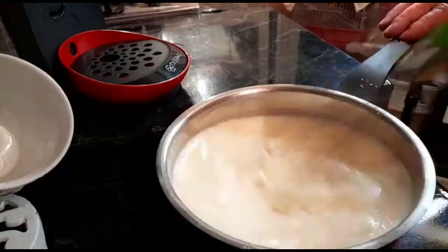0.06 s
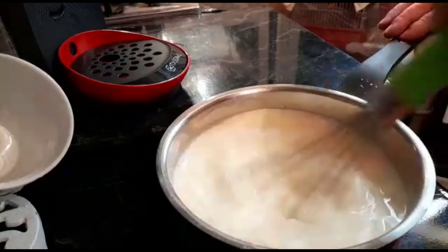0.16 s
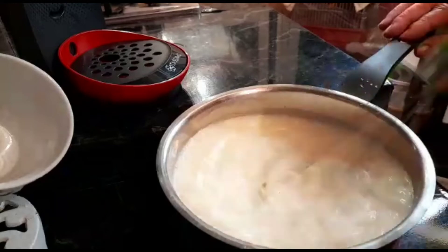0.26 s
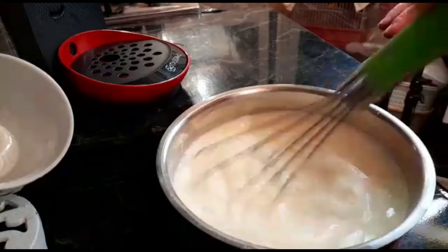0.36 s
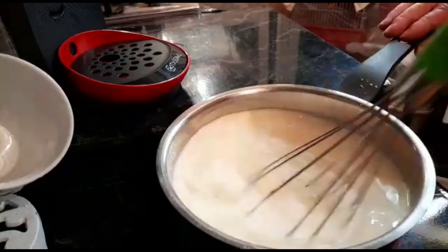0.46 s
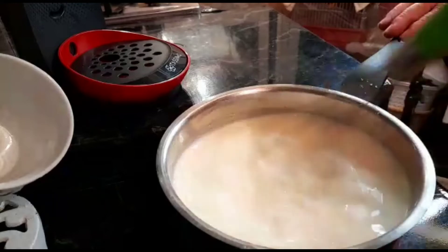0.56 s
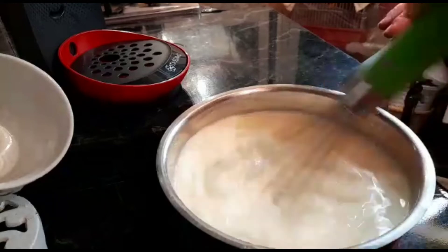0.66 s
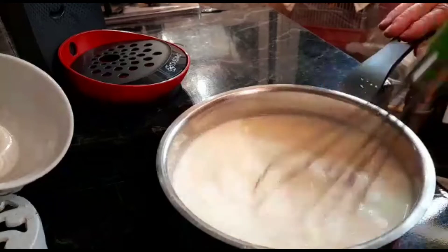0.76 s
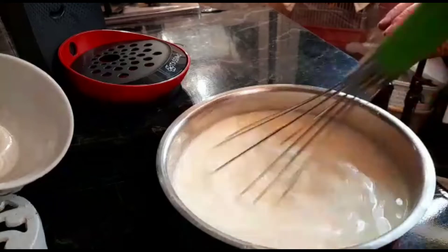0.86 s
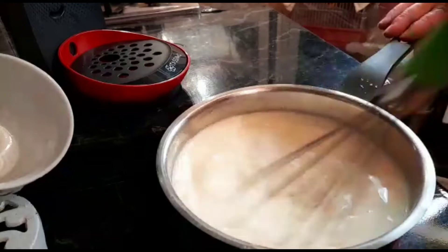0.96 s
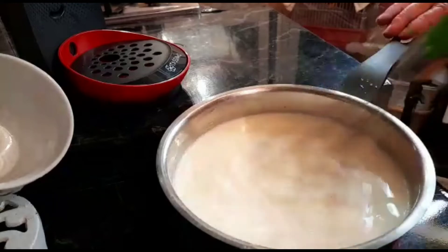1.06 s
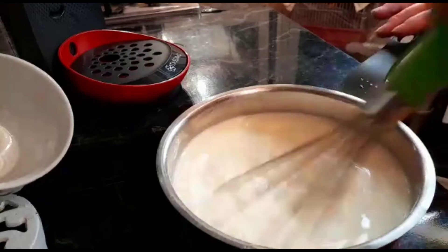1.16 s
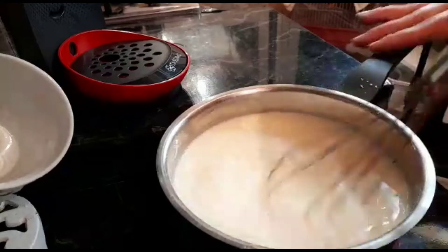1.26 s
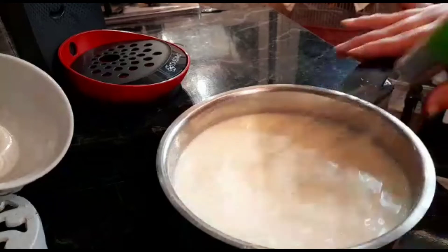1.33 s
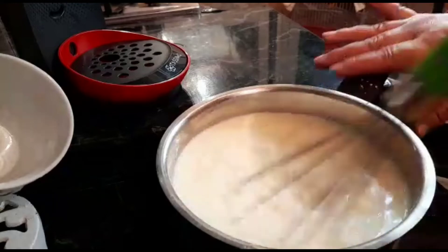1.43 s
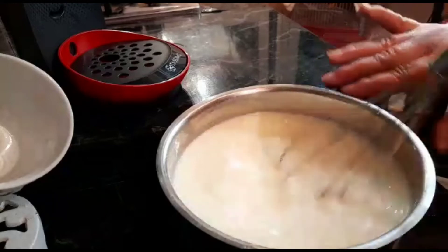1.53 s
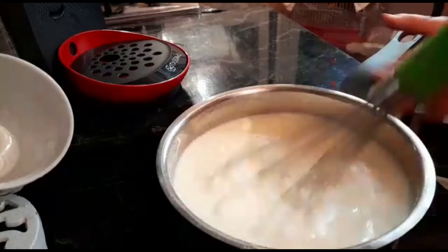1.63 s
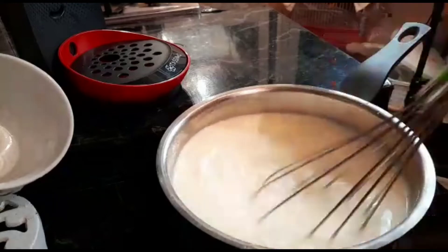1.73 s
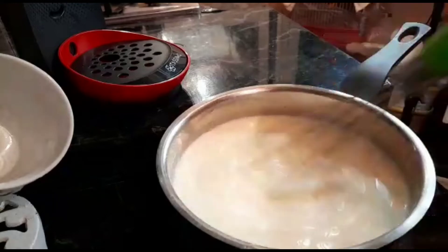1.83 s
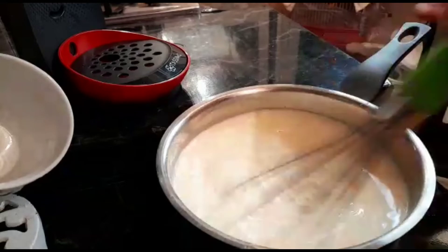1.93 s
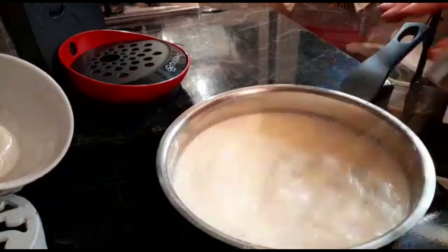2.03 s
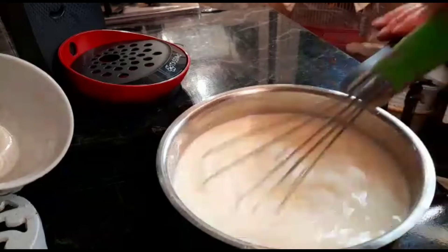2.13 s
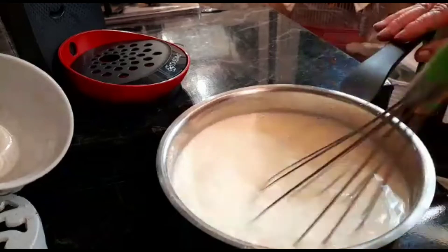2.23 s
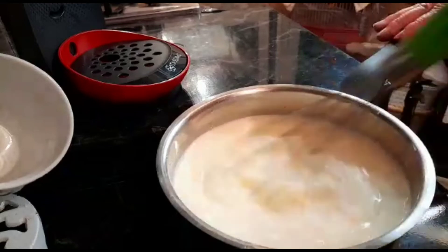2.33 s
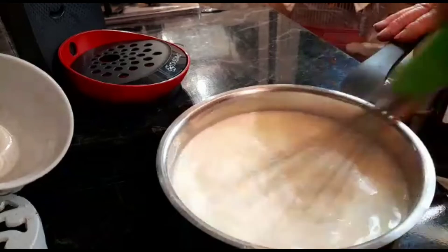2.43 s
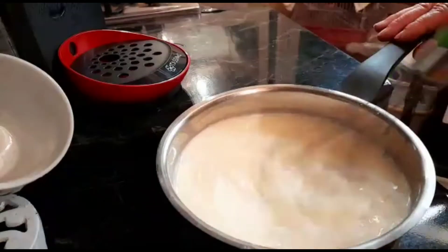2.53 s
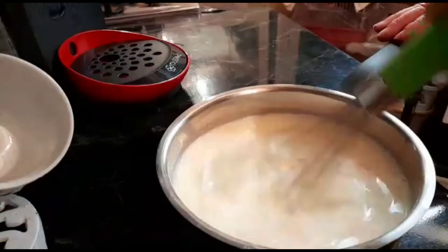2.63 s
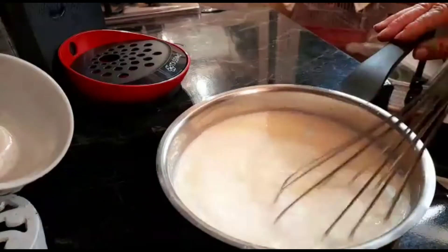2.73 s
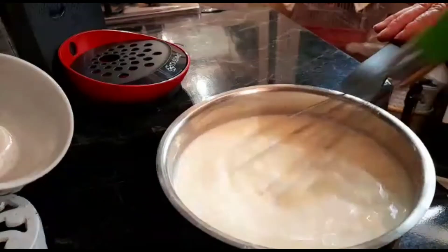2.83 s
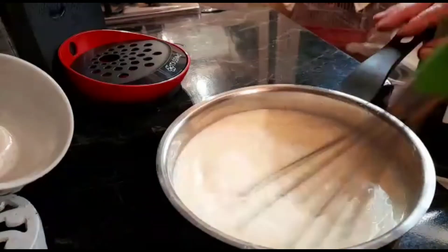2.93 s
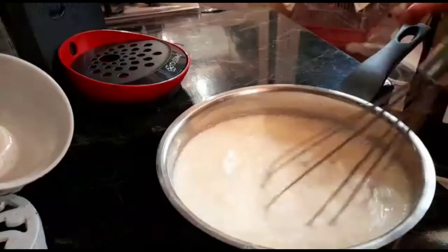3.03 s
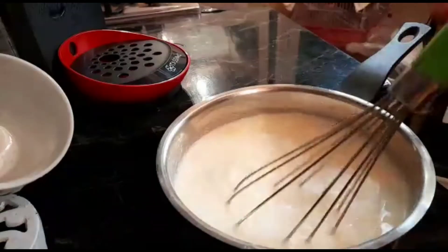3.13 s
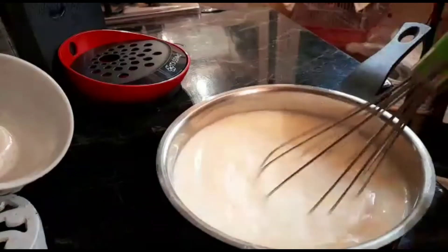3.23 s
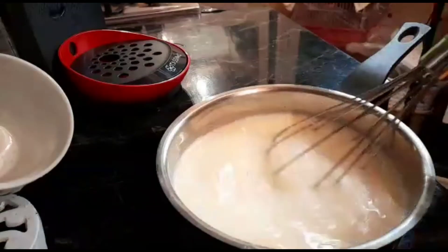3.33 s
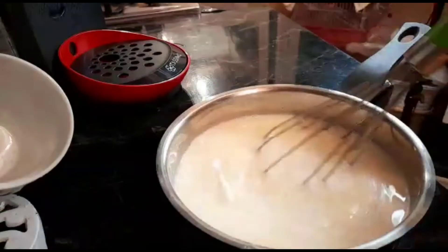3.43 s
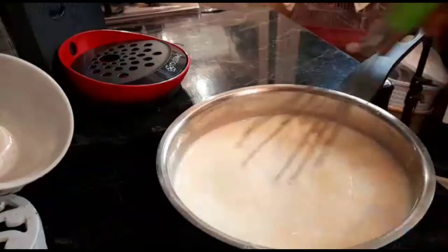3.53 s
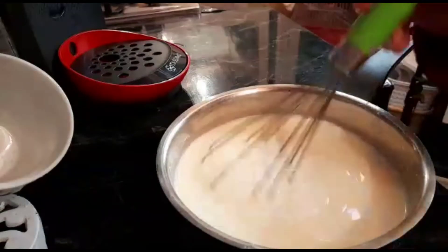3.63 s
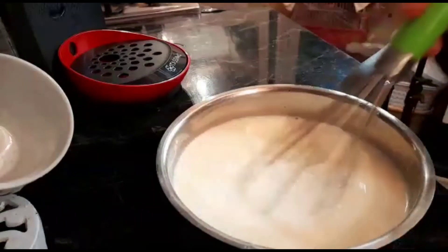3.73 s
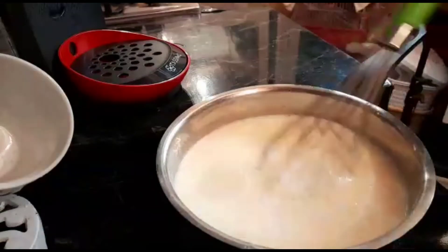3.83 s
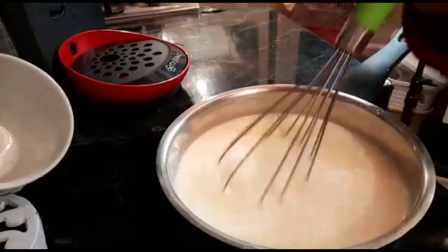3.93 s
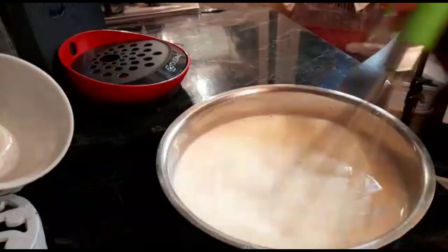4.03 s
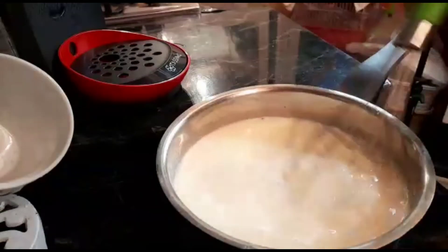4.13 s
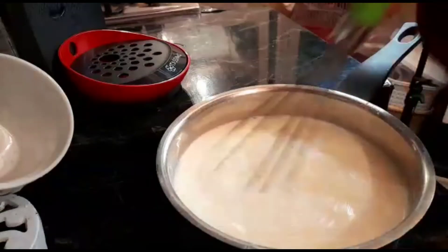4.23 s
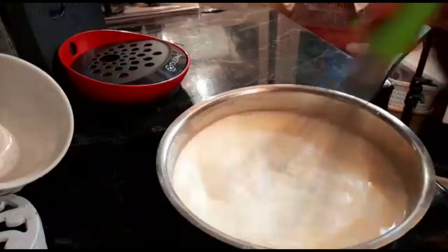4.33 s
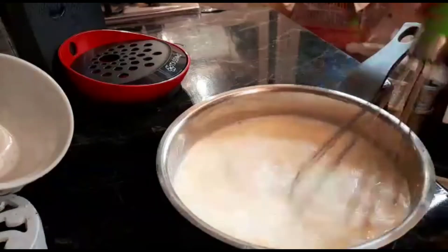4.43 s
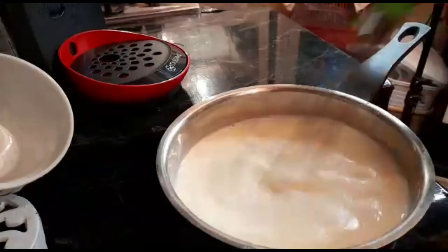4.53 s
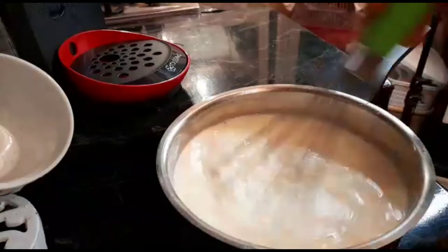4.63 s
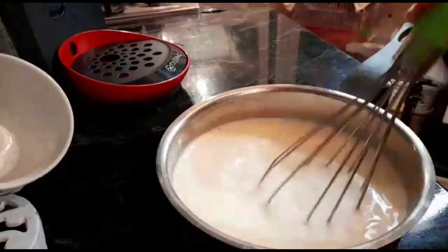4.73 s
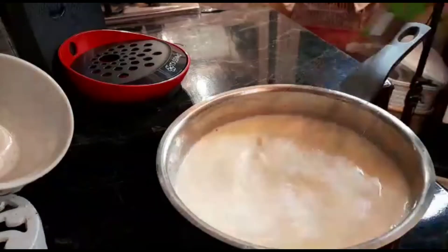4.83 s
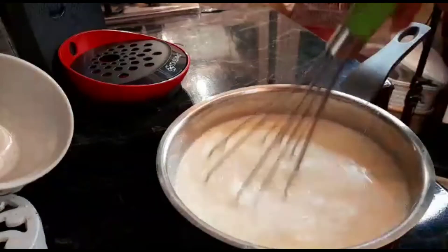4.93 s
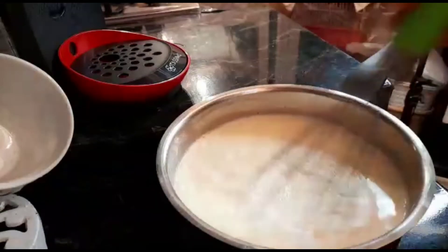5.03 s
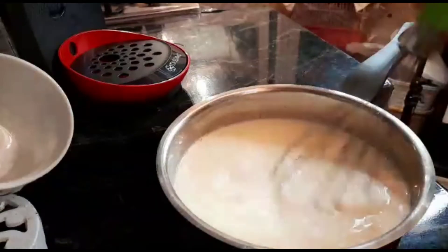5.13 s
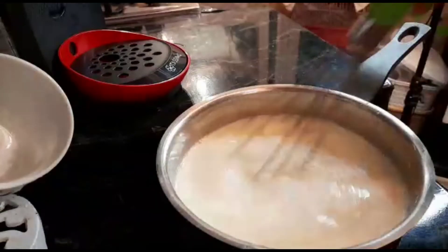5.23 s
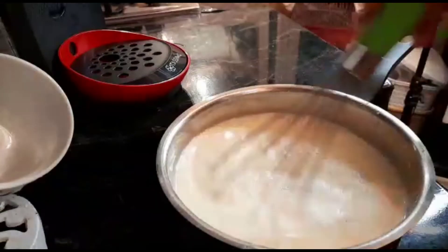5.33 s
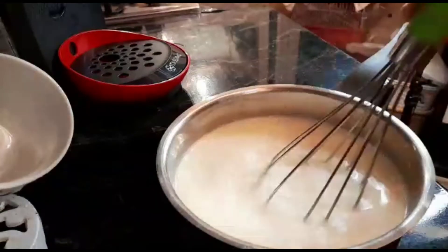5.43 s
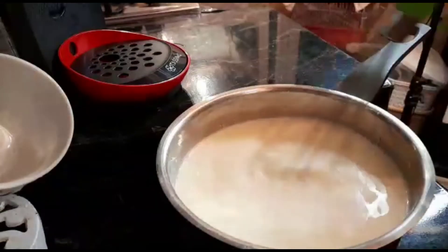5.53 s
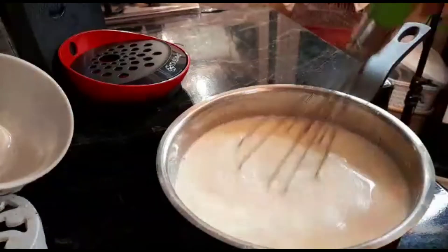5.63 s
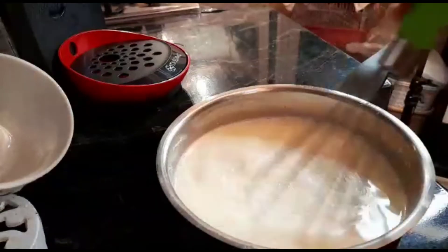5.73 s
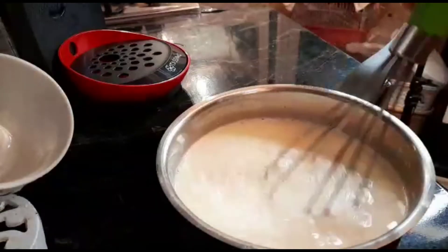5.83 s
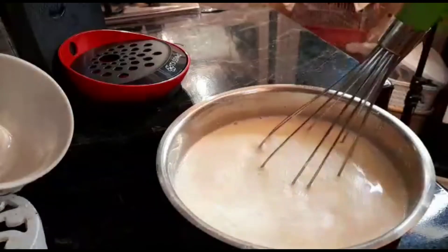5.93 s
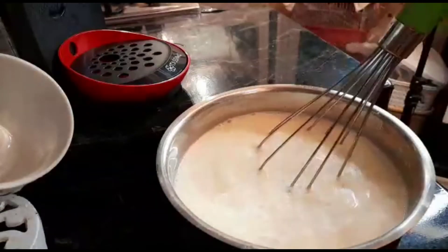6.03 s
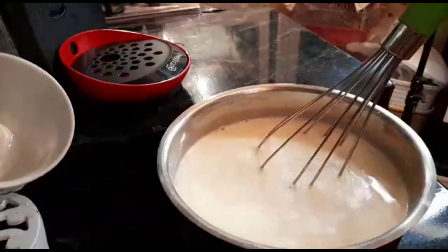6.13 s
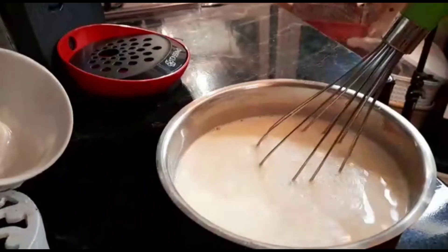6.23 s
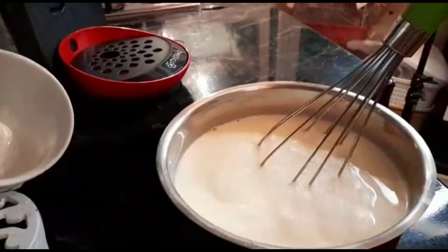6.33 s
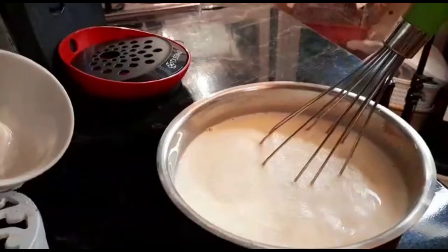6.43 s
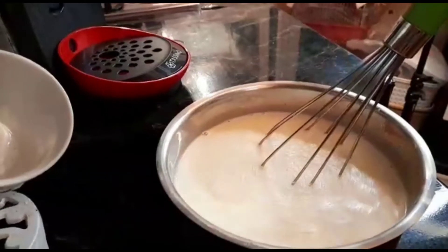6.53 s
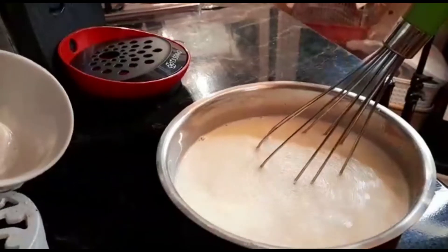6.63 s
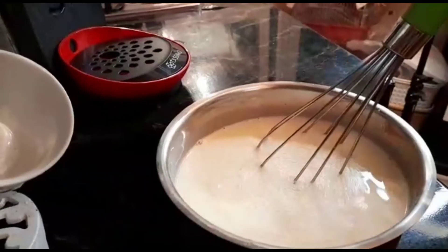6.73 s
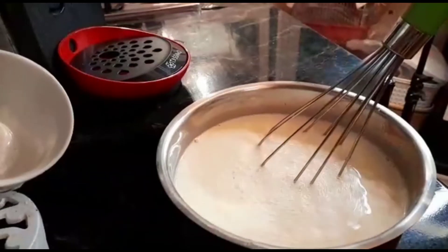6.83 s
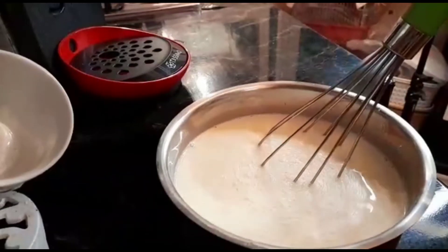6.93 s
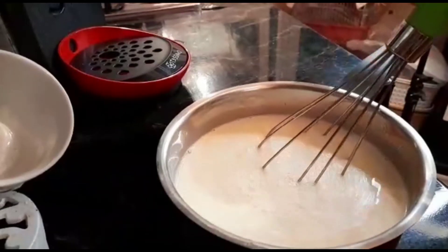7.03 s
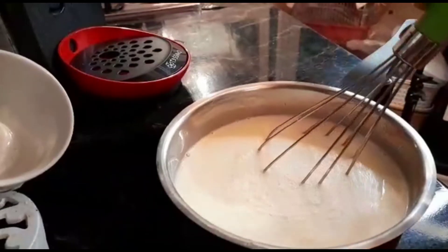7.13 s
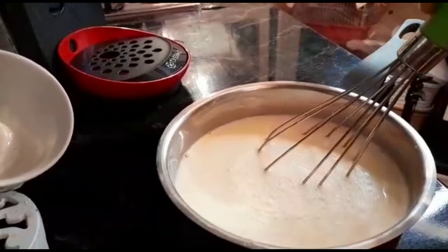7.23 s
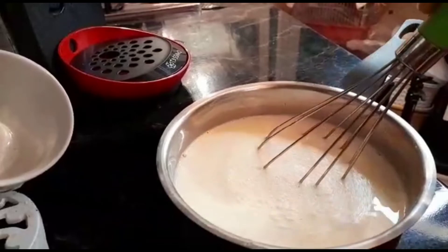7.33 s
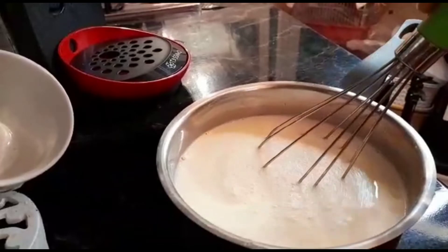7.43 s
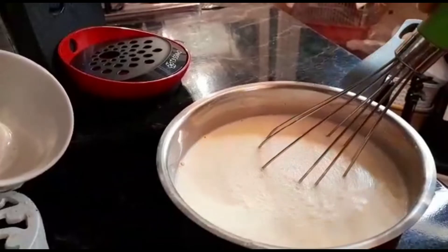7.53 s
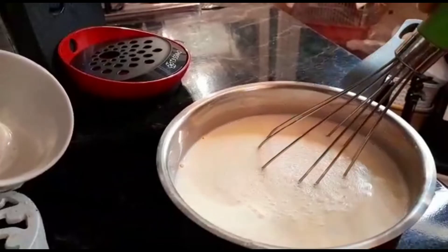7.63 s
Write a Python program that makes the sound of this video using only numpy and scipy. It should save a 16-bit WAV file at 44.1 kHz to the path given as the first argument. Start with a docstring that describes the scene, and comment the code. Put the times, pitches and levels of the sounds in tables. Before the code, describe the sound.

A close, fairly dry stereo sound of a wire whisk beating batter in a steel saucepan in a quiet kitchen. From 0 to about 3.2 seconds the strokes are quick and uneven: hard, bright ticks of wires on steel, strongest near 0.43, 0.97, 1.2, 1.6, 2.0, 2.45 and 2.7, each followed by a tiny rattle. Between them run lighter clicks, a gritty rasping scrape and short, glassy pan tones, with an occasional soft low note as the pan rocks. The whisking fades to almost nothing around 3.4 to 3.6, then resumes softer and looser, with sharper clicks near 4.2, 4.6 and 4.9. A tight, bright cluster strikes at 5.57 to 5.6, with lesser knocks until 5.85. By 6.0 the scraping dies; faint ticks follow at 6.2 and 6.3. To 7.6 only very faint hum, rumble, hiss and fine foam crackle remain.

```python
"""Quick clusters of steel ticks and a rasping scrape: a wire whisk beats batter in a saucepan, heard from close by.
Blows and friction are noise-like forces that excite three damped resonators: pan floor, pan wall and wires.
Single modes sing out as short gliding tones; at times the pan rocks with a low note, a sine in soft swells.
Filtered noise and two mains tones make hum, rumble and faint hiss; decaying treble noise bursts make foam pops.
A short, faint echo of decaying noise is the quiet kitchen."""
import sys
import numpy as np
from scipy import signal
from scipy.fft import rfft, irfft, next_fast_len
from scipy.io import wavfile
from scipy.ndimage import uniform_filter1d

SR = 44100
rng = np.random.default_rng(int(sys.argv[2]) if len(sys.argv) > 2 else 0)


def int16_out(signal):
    """Quantize to a 16-bit WAV file."""
    q = np.round(np.clip(np.atleast_2d(signal).T, -1, 1) * 32767)
    wavfile.write(sys.argv[1], SR, q.astype(np.int16))


N = 338247

# Level of hum, rumble and mains tones before their waver: (time [s], level [dB])
HUM_LEVEL = [(0.0, -58.5), (0.35, -62), (0.5, -58), (1.28, -59), (1.8, -62), (2.1, -61), (2.3, -61),
             (2.55, -60.5), (2.76, -59), (3.1, -61.5), (3.5, -67.5), (4.29, -55.5), (4.8, -59.5),
             (5.3, -56.5), (5.7, -66.5), (5.94, -60.5), (6.62, -74.5), (7.0, -68.5), (7.67, -66.5)]
# Hum lines, resonances of noise: (frequency [Hz], width [Hz], relative level [dB])
HUM_LINES = [(99.5, 12, -1), (145, 10, -6.5), (219, 21, -3.5)]
# Spectrum of rumble and hiss: (frequency [Hz], relative density [dB per Hz])
AIR_SPECTRUM = [(18, -40.5), (30, -1.5), (55, -2.5), (75, -13.5), (109, -7.5), (233, 0.5), (600, -21.5),
                (2830, -33.5), (3140, -30), (5740, -29), (6720, -28), (7470, -36.5), (9710, -18),
                (14000, -29), (16000, -47.5)]
# Swells of the rocking pan: (time [s], peak level [dB], half-width to 1/e [ms])
ROCKS = [(.595, -42.5, 37), (.33, -57, 42), (1.61, -57, 35), (2.7, -52.5, 28), (3.06, -48.5, 36),
         (3.88, -61.5, 50), (4.56, -57.5, 38), (5.09, -49.5, 32), (5.76, -55, 30), (6.03, -59.5, 67),
         (6.2, -65, 32), (6.719, -70, 53), (6.99, -61, 39), (7.42, -65, 44)]
# Dense upper modes and microphone colour: (frequency [Hz], relative density [dB per Hz])
UPPER_MODES = [(210, -44), (350, -29.5), (522, -5), (653, -8), (974, 0), (1140, 3), (1650, -4), (2500, 0),
               (2710, -7.5), (3230, -1), (4750, -4.5), (5940, -11), (8000, -6), (10000, 0), (11200, 1),
               (12500, -5), (15300, -7.5), (15700, -14), (15900, -36), (16600, -43)]
# Clear pan modes: (frequency [Hz], width before narrowing [Hz], relative level [dB])
PAN_MODES = [(539.5, 83, -10), (797, 21, -18.5), (1096.4, 35, -7), (1230, 70, -4.5), (1496, 20, -8),
             (1963, 22, -2), (2410, 41, -0.5), (3460, 58, -8.5), (3820, 430, 2.5), (4775, 170, 4.5),
             (5990, 48, -16.5)]
# Floor, wall and wires in turn: (low edge [Hz], high edge [Hz], t60 [s], share common to both ears [1],
# blow gain [dB], scrape gain [dB], clear-mode gain [dB], crack against ring [1], crack decay [s])
PARTS = [(400, 2200, 0.24, 0.62, 0.5, -8, -1.5, 2.4, 0.0035),
         (2530, 6800, 0.14, 0.13, 2.5, -3, -13, 3.5, 0.0019),
         (5905, 38000, 0.066, 0.041, 0.5, 0, -41, 5.6, 0.0011)]
# Clear blows: (time [s], wire drive [dB], floor drive [dB], wall drive [dB], cluster length [ms])
BLOWS = [(0.003, -33, -33.5, -34.5, 5.9), (0.111, -60, -44.5, -66, 66), (0.141, -46, -49, -42.5, 3.5),
         (0.173, -45, -42.5, -33.5, 4.6), (0.253, -53.5, -46, -58, 4), (0.336, -33.5, -35, -36, 6.4),
         (0.346, -33.5, -47, -46, 40), (0.393, -32.5, -67, -62, 7.9), (0.408, -30.5, -52, -61, 9),
         (0.4267, -12.5, -28, -27, 2), (0.4294, -17, -27, -34, 2.9), (0.433, -26, -38, -33.5, 18),
         (0.448, -29.5, -37, -38, 10), (0.461, -28, -35, -41, 10), (0.479, -32, -42, -40, 8),
         (0.666, -53, -39.5, -40, 4.3), (0.727, -25, -32.5, -35, 13), (0.848, -55, -43, -34.5, 5.9),
         (0.903, -35.5, -38.5, -42, 9), (0.967, -17, -29.5, -29.5, 3.3), (0.971, -19.5, -30.5, -34, 4.3),
         (1.068, -55, -39.5, -53, 11), (1.123, -46, -41.5, -57, 5.5), (1.169, -43, -55, -46, 30),
         (1.187, -50, -65, -31, 3), (1.215, -14, -32, -31, 4.2), (1.22, -14, -30, -21, 3.6),
         (1.225, -25, -39, -30, 19), (1.412, -43, -54, -59, 22), (1.421, -50, -60, -47.5, 29),
         (1.462, -38, -54, -40, 7.7), (1.525, -56, -45.5, -47, 11), (1.568, -38, -49, -42.5, 10),
         (1.605, -14.5, -36, -30, 2.6), (1.609, -22.5, -30.5, -28.5, 5.3), (1.756, -55, -52, -49, 6),
         (1.78, -63, -44.5, -44, 41), (1.861, -36, -40, -40.5, 24), (1.927, -34, -38, -34.5, 4.8),
         (1.983, -29, -41, -37, 6), (1.99, -16, -28.5, -23, 4.3), (1.994, -19, -33.5, -29.5, 10.8),
         (2.095, -50, -38, -39, 5), (2.107, -36, -47, -34, 6), (2.182, -33, -43.5, -36, 4.2),
         (2.228, -21.5, -33.5, -32, 2.6), (2.235, -35, -53, -45, 15), (2.341, -39, -48, -40, 6.5),
         (2.361, -40, -41, -38, 7.3), (2.446, -14.5, -27, -27, 6.8), (2.501, -27, -44, -37, 6),
         (2.551, -29, -43, -32, 2.8), (2.641, -35, -41.5, -42, 6), (2.686, -36, -62, -38, 6),
         (2.702, -30, -47, -35, 11), (2.719, -18, -32.5, -22.5, 5.7), (2.724, -19, -35, -24.5, 5.2),
         (2.73, -21.5, -35, -26, 8.7), (2.79, -50, -57, -47, 5), (2.849, -38, -59, -45, 13),
         (2.884, -32.5, -37.5, -39.5, 7.8), (2.936, -38, -73, -42, 31), (2.986, -34, -41, -37, 10),
         (3.049, -56, -39.5, -55, 6), (3.078, -53, -62, -42, 7.9), (3.147, -36.5, -56.5, -54, 30),
         (3.182, -39, -75, -56, 6.4), (3.253, -43.5, -52, -49.5, 73), (3.363, -35.5, -51, -46.5, 4.1),
         (3.389, -54, -52, -58.5, 16), (3.501, -71.5, -62, -68.5, 14), (3.538, -57, -56, -59, 33),
         (3.604, -56, -56.5, -55, 23), (3.672, -58, -60, -64, 13), (3.749, -48, -54.5, -53, 17),
         (3.811, -58, -48.5, -49, 6), (3.851, -60, -42.5, -51, 6.8), (3.928, -41, -58, -42.5, 22),
         (3.977, -48, -41, -41.5, 10.5), (4.022, -52, -44, -45, 9.8), (4.062, -46, -46.5, -42, 13),
         (4.124, -58, -47, -48, 27), (4.162, -31, -39, -37, 7), (4.26, -52, -54, -40, 6),
         (4.299, -42, -48, -38, 7.4), (4.383, -41, -53, -39, 10), (4.41, -53, -55, -44.5, 7.1),
         (4.455, -48, -61, -46, 5.9), (4.514, -41.5, -72, -42, 29), (4.583, -67, -52, -49.5, 53),
         (4.626, -42, -50, -42, 4.9), (4.631, -29, -35, -29, 3.5), (4.637, -38, -43.5, -35.5, 10.4),
         (4.701, -41.5, -57, -47.5, 59), (4.757, -54, -45.5, -43, 6.5), (4.803, -63, -46.5, -49, 9.3),
         (4.818, -50, -48, -47, 8.7), (4.856, -40, -41, -39, 6.8), (4.908, -26.5, -45, -34.5, 22.6),
         (5.113, -59, -44, -44.5, 44), (5.249, -48, -64, -47, 3), (5.262, -48, -46, -43, 8),
         (5.272, -27.5, -50, -35.5, 2.8), (5.277, -37, -49, -34, 14), (5.301, -44, -41.5, -39, 6.4),
         (5.382, -44, -69, -55, 38), (5.424, -41.5, -55, -47, 37), (5.487, -49, -41, -47, 13.5),
         (5.566, -18, -41, -30, 1.8), (5.568, -19.5, -40, -27, 2.2), (5.571, -14, -35, -25.5, 2.1),
         (5.574, -33.5, -49, -38.5, 31), (5.61, -17, -40, -31, 2.5), (5.614, -29, -40, -33.5, 11.4),
         (5.689, -30.5, -33.5, -29.5, 8), (5.755, -35, -32, -37, 5.7), (5.802, -58, -43.5, -40.5, 11),
         (5.848, -57, -61, -40, 6.3), (5.943, -48, -46, -52, 4.5), (5.976, -47.5, -52, -53, 5.5),
         (6.174, -46, -68, -56, 2.7), (6.288, -47.5, -74, -51, 3.7), (6.292, -50.5, -60.5, -47.5, 3.4),
         (7.43, -67, -76, -73, 8)]
# Scraping: (time [s], wire pressure [dB], floor against wires [dB]); the last is high on the bottom
SCRAPE = [(0.0, -48, 13.5), (0.17, -33, -26.5), (0.32, -45, 1), (0.49, -41, -5), (0.8, -42.5, -7),
          (1.05, -40.5, -6.5), (1.28, -41, -2.5), (1.38, -42.5, -8), (1.45, -38, -8), (1.5, -48.5, -5.5),
          (1.575, -43, -3), (1.6, -48.5, -7), (1.65, -34, -0.5), (1.74, -45, -14), (1.8, -42, -10),
          (2.0, -40, -9.5), (2.08, -42, 4), (2.19, -38.5, -7.5), (2.35, -45, -5), (2.46, -34.5, -1.5),
          (2.62, -40.5, -8.5), (2.81, -42, -3.5), (3.03, -45, -4), (3.17, -48.5, -7.5), (3.34, -61.5, -12),
          (3.41, -72, 6), (3.47, -79, 5.5), (3.61, -68, -0.5), (3.73, -43.5, -18), (3.9, -54, -4.5),
          (4.1, -44, -6.5), (4.3, -38.5, -8), (4.43, -41, -5), (4.56, -53.5, -3.5), (4.64, -48, -12),
          (4.84, -44, -4), (5.03, -47.5, -10.5), (5.22, -41.5, -8.5), (5.38, -46.5, -13), (5.53, -47, -10),
          (5.82, -46, 1.5), (5.96, -52.5, -8.5), (6.03, -68, -13), (6.15, -101, -2), (7.22, -99, 5.5),
          (7.29, -92, 11.5), (7.345, -91, 13.5), (7.4, -92.5, 8), (7.5, -99, 5)]
# Single modes under a sliding wire, before flutter:
# (time of peak [s], frequency [Hz], peak level [dB], fall time for 6 dB, at least 4 [ms])
PINGS = [(0.016, 1256, -42.5, 21), (0.09, 1130, -44.5, 8), (0.11, 1175, -40, 7), (0.178, 1490, -45.5, 15),
         (0.18, 790, -46.5, 12), (0.257, 1360, -44, 6), (0.344, 1150, -33.5, 11), (0.414, 1500, -39, 3),
         (0.432, 1160, -39, 9), (0.437, 3190, -45, 35), (0.44, 1200, -32, 8), (0.453, 1300, -28.5, 0),
         (0.467, 1300, -36, 2), (0.483, 2450, -34.5, 1), (0.575, 1197, -47.5, 20), (0.62, 1140, -47, 10),
         (0.672, 1120, -50, 16), (0.731, 1300, -31, 4), (0.822, 1980, -44, 11), (0.853, 1150, -36, 7.5),
         (0.854, 2000, -33.5, 1), (0.972, 1980, -34.5, 4), (0.975, 1310, -34, 9), (1.074, 1107, -43, 20),
         (1.173, 1430, -40.5, 5), (1.222, 2440, -35, 10), (1.224, 3400, -38, 12), (1.227, 1330, -42, 33),
         (1.611, 7300, -39, 6), (1.622, 1520, -37, 14), (1.637, 1200, -37, 8), (1.66, 2500, -40, 6),
         (1.686, 1500, -40.5, 3), (1.795, 1257, -38.5, 14), (1.84, 1040, -44.5, 18), (1.871, 1135, -34, 8),
         (1.934, 764, -41, 16), (2.098, 1170, -28.5, 6.5), (2.11, 1150, -34.5, 11), (2.145, 1100, -41, 17),
         (2.241, 1244, -44, 18), (2.458, 1455, -37.5, 26.5), (2.504, 3830, -30, 6.5), (2.558, 3390, -39, 2),
         (2.728, 4730, -27, 7), (2.735, 3650, -34, 12), (2.74, 1272, -35, 18.5), (2.796, 4940, -42, 12.5),
         (2.857, 1890, -43.5, 15), (2.86, 1084, -40, 20), (2.893, 1410, -43, 8.5), (3.055, 1160, -52, 12),
         (3.083, 4630, -41, 7), (3.27, 1107, -55, 27), (3.347, 1116, -45, 9), (3.548, 1140, -58, 13),
         (3.818, 1240, -46, 5.5), (3.933, 4470, -41, 9), (3.982, 3260, -33, 4), (3.984, 1230, -38, 3),
         (4.07, 2080, -42, 5), (4.167, 4920, -37, 0), (4.41, 2005, -45.5, 9), (4.418, 3240, -48, 5),
         (4.459, 1295, -45, 17), (4.592, 1516, -43, 8), (4.633, 3360, -24.5, 2.5), (4.637, 1180, -39, 6),
         (4.862, 1157, -42, 11), (4.861, 2070, -41, 7), (4.925, 1530, -46.5, 29), (5.198, 1087, -43.5, 28),
         (5.306, 3860, -37, 2), (5.34, 3260, -43, 11), (5.493, 1155, -49.5, 16), (5.585, 1453, -35, 12),
         (5.572, 2590, -38, 13), (5.58, 1077, -49, 28.5), (5.617, 1546, -38, 23), (5.625, 824, -44.5, 27),
         (5.635, 1079, -41.5, 51), (5.694, 1930, -41, 3), (5.704, 1174, -38.5, 13.5),
         (5.762, 1195, -44, 2.5), (5.765, 1540, -49.5, 19.5), (5.768, 521, -42, 20.5),
         (5.86, 544, -55, 25.5), (5.886, 1130, -49.5, 8), (5.93, 1085, -56, 18.5), (6.04, 1027, -78.5, 46),
         (6.178, 5060, -60.5, 4), (6.293, 1310, -52, 3), (6.297, 3040, -49.5, 5.5), (6.32, 3000, -72, 8.5),
         (6.334, 3050, -75, 4), (6.354, 3080, -74, 8), (7.315, 1050, -82, 6), (7.332, 1080, -76.5, 6),
         (7.346, 1020, -77.5, 10), (7.375, 993, -83, 9)]

HISS_DB, HUM_WAVER_DB = -76.5, 3
MAINS_HZ, MAINS_DB, OCTAVE_HZ, OCTAVE_DB = 49.8, -8, 100.5, -4.5  # dB relative to HUM_LEVEL
FOAM_RATE, FOAM_DB, FOAM_SCATTER_DB, FOAM_MS = 80, -77.5, 2, 3.8  # pops per s; decay to 1/e
ROCK_HZ = 227.3
PLACES = 8  # contact places on the pan, each with its own ring
PLACE_SCATTER_DB = 2.5  # unevenness of the colour between places
PLACE_SHIFT = 0.07  # largest share by which the treble hump moves with the place
PLACE_DETUNE = 0.025  # share by which modes scatter with the place and the batter on the wall
CATCH_RATE, CATCH_DB = 400, 19  # catches per s; against the even rub
CRACK, CRACK_S = 2.4, 0.0027  # crack against ring, and its decay to 1/e
THUD_DB, THUD_T60_S = -32.5, 0.099
BLOW_PAN_DB, BLOW_PAN_SCATTER_DB = 0.4, 2.5  # left minus right
FIRST_WIRE_DB = 16.5  # peak of the first tick, relative to the blow's drive
LIGHT_RATE, LIGHT_MS = 14, 12  # chance blows per s; mean cluster length
LIGHT_DB, LIGHT_SCATTER_DB = -7, 2  # against the scraping
WALL_DB, WALL_FOLLOWS_FLOOR = -1, 0.26  # wall against wires; share of the floor's lean
WIRES_PAN_DB = 1.5  # wires, left minus right: the whisk stands left of the pan's middle
RISE_MS, RISE_PER_FALL = 4.5, 0.36  # long pings also swell more slowly
KITCHEN_T60_S, KITCHEN_DB = 0.47, -21.5
TOP_HZ = 16300
OPPOSED = np.array([[1], [-1]])  # left up, right down


def undb(db):
    """Decibel law: level to amplitude ratio."""
    return 10 ** (np.asarray(db) / 20)


def unit(x):
    """Normalization to unit root mean square."""
    return x / np.sqrt(np.mean(x ** 2))


def curve(table):
    """Linear interpolation of a table's columns, one value a sample."""
    s, *columns = np.transpose(table)
    return [np.interp(np.arange(N) / SR, s, c) for c in columns]


def colour(x, points, lo_hz=1., hi_hz=30800.0):
    """Spectral shaping by (frequency [Hz], level [dB]) points within a band."""
    n = next_fast_len(x.shape[-1])
    hz = np.maximum(np.arange(n // 2 + 1) * SR / n, 1)
    point_hz, point_db = np.array(points).T
    gain = undb(np.interp(np.log(hz), np.log(point_hz), point_db))
    edges = 1 / np.sqrt((1 + (lo_hz / hz) ** 12) * (1 + (hz / hi_hz) ** 12))
    return irfft(rfft(x, n) * gain * edges, n)[..., :x.shape[-1]]


def ring(x, hz, width_hz):
    """Damped resonance: a two-pole filter whose impulse response has about unit energy."""
    r = np.exp(-np.pi * width_hz / SR)
    w = 2 * np.pi * hz / SR
    gain = np.sin(w) * np.sqrt(2 * (1 - r * r))
    return signal.lfilter([gain], [1, -2 * r * np.cos(w), r * r], x)


def walk(rate):
    """Slow random modulation: levels drawn at this rate per s and slewed; spread near 1."""
    k = int(SR / rate)
    held = np.repeat(rng.standard_normal(N // k + 1), k)
    return 1.05 * uniform_filter1d(held, k)[:N]


def tail(t60, common, points, lo_hz, hi_hz, crack=CRACK, crack_s=CRACK_S):
    """Modal overlap: many close modes act as decaying noise after a crack; unit energy for each ear."""
    t = np.arange(SR // 5) / SR
    common = np.clip(common, 0, 1)
    shared = np.sqrt(common) * rng.standard_normal(len(t))
    noise = shared + np.sqrt(1 - common) * rng.standard_normal((2, len(t)))
    decay = np.exp(-np.log(1000) * t / t60) + crack * np.exp(-t / max(crack_s, 1 / SR))
    out = colour(noise, points, lo_hz, hi_hz) * decay
    return out / np.sqrt(np.mean(out ** 2, axis=1, keepdims=True) * len(t))


def kitchen_air():
    """Superposition of steady sources: mains tone, near-octave, hum lines, rumble and thin hiss."""
    hum = 0
    for hz, width, db in HUM_LINES:
        source = rng.standard_normal(N) + 0.41 * rng.standard_normal((2, N))  # nearly alike in both ears
        hum = hum + undb(db) * unit(ring(source, hz, width))
    hum = colour(hum, [(30, 0.0041), (300, 0.011)], 75., 460.0)
    apart = 0.25 * np.array([walk(8), walk(8)])  # phase drift of each ear in radians
    mains_phase = 2 * np.pi * MAINS_HZ * np.arange(N) / SR + apart
    mains = undb(MAINS_DB + 1.5 * walk(3.9)) * np.sin(mains_phase)
    octave_phase = 2 * np.pi * np.cumsum(OCTAVE_HZ + 1.6 * walk(3.7)) / SR + apart
    mains = mains + undb(OCTAVE_DB + 2.5 * walk(9.2)) * np.sin(octave_phase)
    rumble = rng.standard_normal(N) + 0.56 * rng.standard_normal((2, N))
    rumble = colour(rumble, AIR_SPECTRUM, 38.0, 380.0)
    hiss = colour(rng.standard_normal((2, N)), AIR_SPECTRUM, 450.) * undb(1.5 * walk(12))
    low_level = undb(curve(HUM_LEVEL)[0] + HUM_WAVER_DB * walk(9.4))
    low = low_level * (undb(-7.0) * hum + undb(-6.0) * unit(rumble) + mains)
    return (low + undb(HISS_DB) * unit(hiss)) * undb(1.4 * OPPOSED)


def foam():
    """Impulsive radiation: tiny bubbles burst on the batter as chance treble noise pops."""
    starts = (rng.random(N) < FOAM_RATE / SR) * undb(FOAM_SCATTER_DB * rng.standard_normal(N))
    fade = signal.lfilter([1], [1, -np.exp(-1000 / (FOAM_MS * SR))], starts)
    pops = colour(fade * rng.standard_normal((2, N)), UPPER_MODES, 9100.0, 14000.)
    return undb(FOAM_DB) * unit(pops) * undb(np.array([[1.6], [-1.4]]))


def rocking():
    """Rigid-body oscillation: the pan rocks on its stand in soft swells of one low note."""
    t = np.arange(N) / SR
    swell = sum(undb(db) * np.exp(-((t - s) * 1000 / ms) ** 2) for s, db, ms in ROCKS)
    return swell * np.sin(2 * np.pi * ROCK_HZ * t) * undb(1.5 * OPPOSED)


def scraping():
    """Friction: levels in dB of the drag on wires, floor and wall."""
    wires_db, lean_db = curve(SCRAPE)
    return wires_db, wires_db + lean_db, wires_db + WALL_DB + WALL_FOLLOWS_FLOOR * lean_db


def grit(scatter_db):
    """Random microcontacts of unequal size whose strength evens out over a few ms."""
    x = rng.standard_normal(N) * undb(scatter_db * rng.standard_exponential(N))
    return unit(x / (uniform_filter1d(x ** 2, size=SR // 250) + 1e-9) ** .3)


def rubbing():
    """Stick and slip: lone ticks, as wires catch on the steel, over an even rub."""
    catch = rng.random(N) < CATCH_RATE / SR
    catch = catch * undb(CATCH_DB + 0.9 * rng.standard_normal(N))
    return unit(grit(2.4) + catch)


def light_blows():
    """Random impacts: rows of chance blows whose strength follows the scraping."""
    u = rng.random((int(LIGHT_RATE * SCRAPE[-1][0]), 2)).T
    s = u[0] * SCRAPE[-1][0]
    scatter = LIGHT_SCATTER_DB * rng.standard_normal((len(s), 3)).T
    db = np.array(scraping())[:, (s * SR).astype(int)] + LIGHT_DB + scatter
    return np.transpose([s, *db, -LIGHT_MS * np.log(1 - u[1])])


def blows():
    """Impact forces (part, ear, sample): the first wire is one hard tick, the others rattle after it."""
    force, knock = np.zeros((3, 2, N)), grit(4.2)
    t = np.arange(SR // 8) / SR
    for s, wires_db, floor_db, wall_db, ms in [*BLOWS, *light_blows()]:
        i = int(s * SR)
        pan_db = BLOW_PAN_DB + BLOW_PAN_SCATTER_DB * rng.standard_normal()
        fade = np.exp(-(t * 1000 / max(ms, 1)) ** 1.5)
        rattle = fade * knock[i:i + len(t)]
        rattle = rattle * np.linalg.norm(fade) / np.linalg.norm(rattle)  # same energy, however wires fall
        shape = rattle + undb(FIRST_WIRE_DB) * (t == 0)
        size = undb([floor_db, wall_db, wires_db])[:, None] * undb(np.array([pan_db, -pan_db]) / 2)
        force[:, :, i:i + len(t)] += size[:, :, None] * shape
    return force


def upper_modes_at_place():
    """Position-dependent excitation: upper-mode colour at one contact place; the top edge stays."""
    hz, db = np.transpose(UPPER_MODES)
    hump = (hz > 6000) * (hz < 13000)
    hz = hz * (1 + PLACE_SHIFT * np.tanh(rng.standard_normal()) * hump)
    return np.transpose([hz, db + PLACE_SCATTER_DB * rng.standard_normal(len(hz)) * (hz < 15000)])


def swell_ms(s, fall):
    """Causality: the rise time of a ping is limited by the time since the last clear blow."""
    since_ms = 1000 * min(s - row[0] for row in BLOWS if row[0] < s)
    return min(RISE_MS + RISE_PER_FALL * fall, 0.81 * since_ms)


def chatter(level_db, rate, scatter_db):
    """Random modal excitation: rows of chance pings near pan modes, whose level follows the scraping."""
    u = rng.random((int(rate * SCRAPE[-1][0]), 5)).T
    s = u[0] * SCRAPE[-1][0]
    hz, _, db = np.array(PAN_MODES)[(u[1] * len(PAN_MODES)).astype(int)].T
    hz = hz * (1 + 0.18 * (u[2] - .5))
    part = (hz > PARTS[0][1]).astype(int)  # floor below its upper edge, wall above
    db = .5 * db + level_db[part, (s * SR).astype(int)] + scatter_db * u[3] ** 2
    return np.transpose([s, hz, db, 2.8 + 3.8 * u[4], 1.4 + 5.6 * u[4]])


def pings(rows, glide):
    """Single-mode vibration: tones swell, fade, bend as the batter moves and reach the ears out of step."""
    out = np.zeros((2, N + SR // 5))
    t = np.arange(-SR // 20, SR // 7) / SR
    for (s, hz, db, rise, fall), (bend, turn, pan) in zip(rows, rng.standard_normal((len(rows), 3))):
        swell = np.exp(-(t * 1000 / max(rise, 1)) ** 2)
        fade = 2 ** (-(np.abs(t) * 1000 / max(fall, 4)) ** 1.5)
        shape = np.where(t < 0, swell, fade)
        phase = 2 * np.pi * hz * (t + glide * bend * t * t)
        apart = OPPOSED * np.tanh(turn) * min(hz / 1800., 1.3)
        tone = undb(db + OPPOSED * (-0.5 + pan)) * shape * (np.sin(phase) + apart * np.cos(phase))
        i = int(s * SR) - SR // 20
        out[:, max(i, 0):i + len(t)] += tone[:, max(-i, 0):]
    return out[:, :N]


def singing(floor_db, wall_db):
    """Modes under a sliding wire: small chance pings and the clear ones, which flutter as it keeps touching."""
    small = chatter(np.array([floor_db - 2.5, wall_db - 5.5]), 120., 6.0)
    clear = [(s, hz, db, swell_ms(s, fall), fall) for s, hz, db, fall in PINGS]
    return pings(small, .5) + pings(clear, .05) * undb(1.2 + 3 * walk(110))


def whisk():
    """Forced vibration: blows and drag drive floor, wall and wires at a wandering contact place."""
    wires_db, floor_db, wall_db = scraping()
    moving = np.arange(N) / SR < SCRAPE[-1][0]
    slip_db = 2.65 * walk(60)
    hold = SR // 26  # samples before the next draw of a contact place
    place = np.repeat(rng.integers(0, PLACES, N // hold + 1), hold)[:N]
    rub, force, out = rubbing(), blows(), 0
    for k, (lo, hi, t60, common, blow_db, scrape_db, modes_db, *crack) in enumerate(PARTS):
        part_db = (floor_db, wall_db, wires_db)[k]
        drag = undb(part_db + scrape_db + slip_db + 1.2 * walk(22)) * moving
        push = undb(blow_db) * force[k] + drag * rub * undb(0.8 * OPPOSED)
        push = push * undb(WIRES_PAN_DB * k / 4 * OPPOSED)  # none for floor, half for wall
        for p in range(PLACES):
            dense = tail(t60, common, upper_modes_at_place(), lo, hi, *crack)
            out = out + signal.oaconvolve(push * (place == p), dense, axes=1)[:, :N]
        for hz, width, db in PAN_MODES:
            if lo <= hz < hi:
                ears = np.array([[1], [np.cos(hz / 1000.0)]])
                drive = push[0] * undb(db + modes_db + 4.44 * walk(25))
                mode = 0
                for p in range(PLACES):
                    place_hz = hz * (1 + PLACE_DETUNE * rng.standard_normal())
                    mode = mode + ring(drive * (place == p), place_hz, 0.52 * width)
                out = out + ears * mode
    out = out + singing(floor_db, wall_db)
    # a pan full of batter radiates little below its lowest mode
    out = signal.sosfilt(signal.butter(4, 420., "high", fs=SR, output="sos"), out)
    # blows also shake the whole pan on its stand
    thud = tail(THUD_T60_S, 0.85, [(120, 0.066), (400, -1.57)], 130., 580.0)
    return out + undb(THUD_DB) * signal.oaconvolve(force[2], thud, axes=1)[:, :N]


def kitchen_echo(near):
    """Reverberation: the whisk convolved with a short decaying noise, darker in the treble."""
    walls = tail(KITCHEN_T60_S, 0.38, [(300, 14.5), (3000, -3.5), (15000, -3.5)], 200.0, 16000.)
    echo = signal.fftconvolve(near.mean(axis=0, keepdims=True), walls, axes=1)[:, :N]
    return undb(KITCHEN_DB) * echo


def scene():
    """Linear superposition of the background, the rocking pan and the whisk with its echo."""
    near = whisk()
    return kitchen_air() + foam() + rocking() + kitchen_echo(near) + near


def record(dry):
    """Band limitation: a steep low-pass filter, as in a phone, cuts the top."""
    return signal.sosfilt(signal.ellip(8, .2, 60, TOP_HZ, fs=SR, output="sos"), dry)


dry = scene()
out = record(dry)
int16_out(out)
```